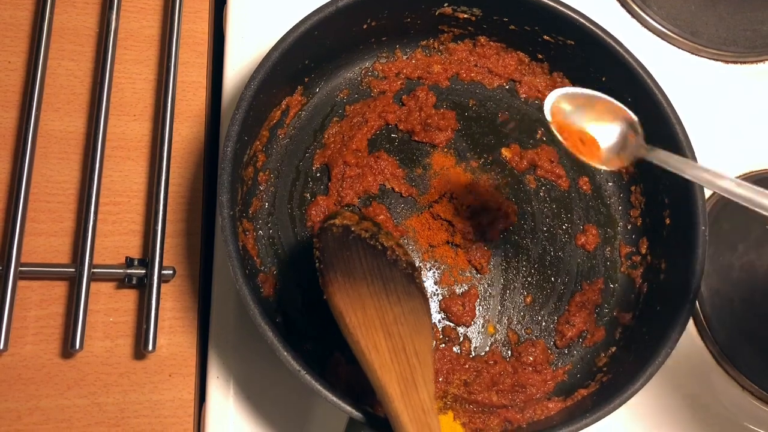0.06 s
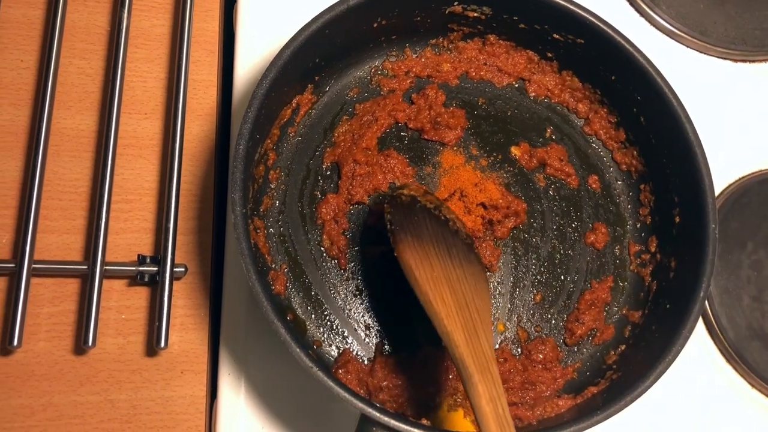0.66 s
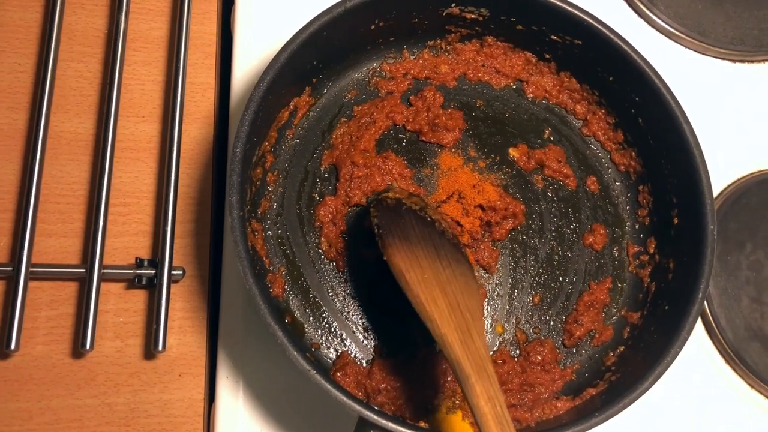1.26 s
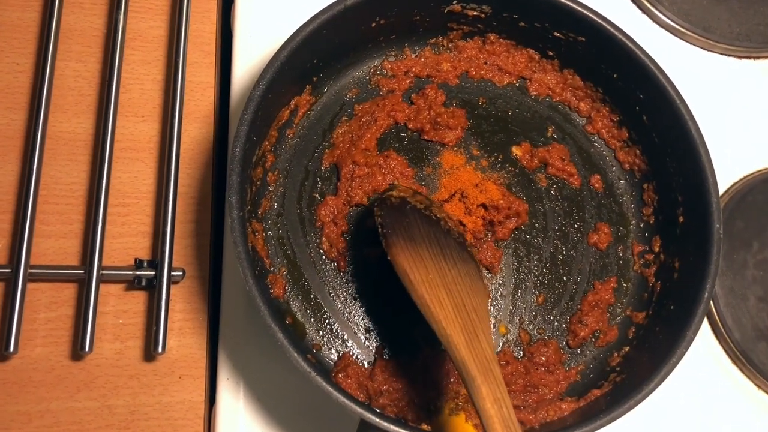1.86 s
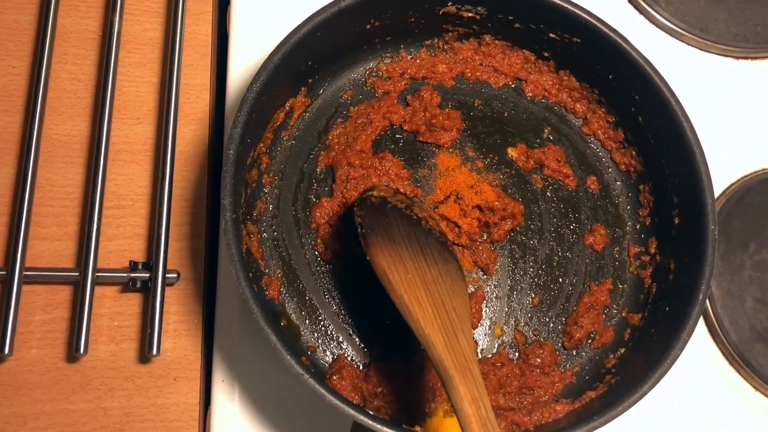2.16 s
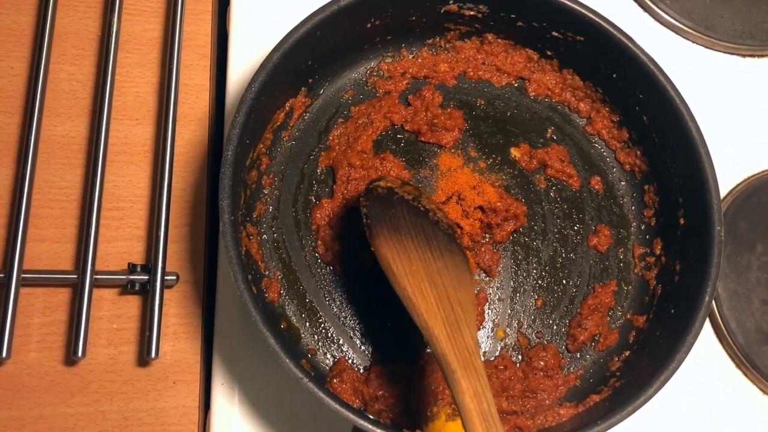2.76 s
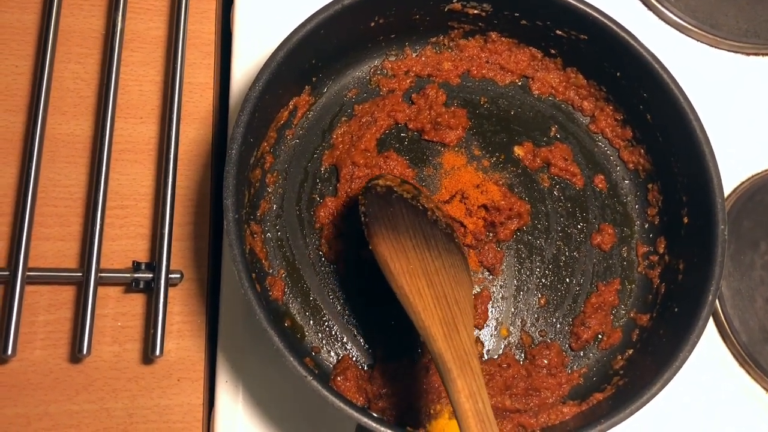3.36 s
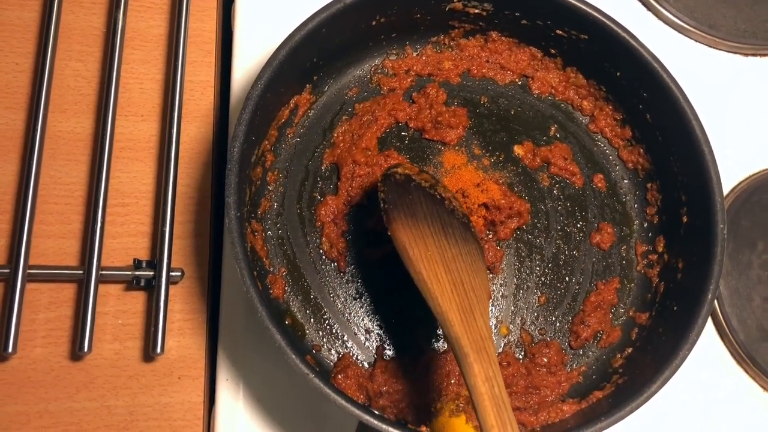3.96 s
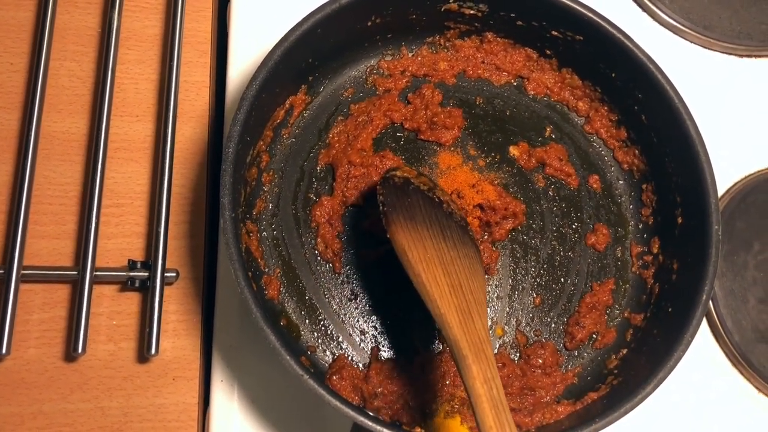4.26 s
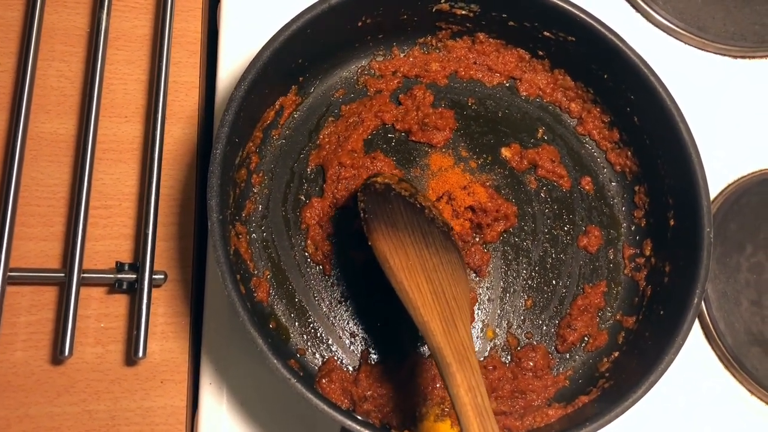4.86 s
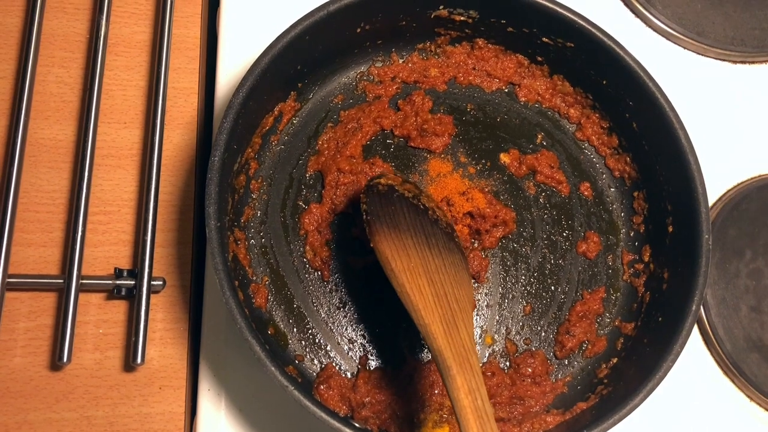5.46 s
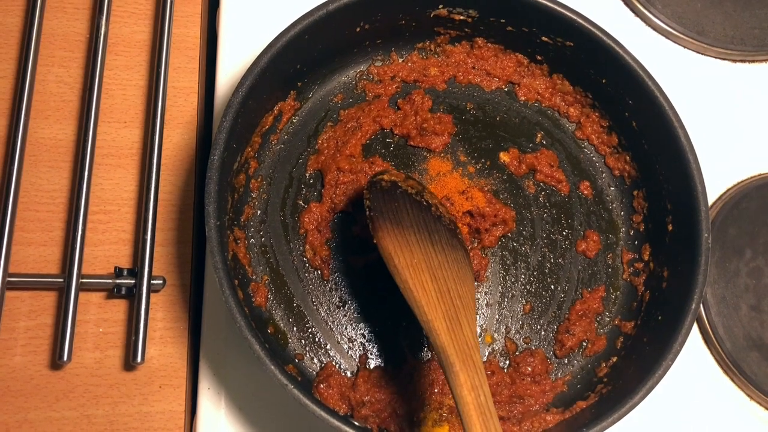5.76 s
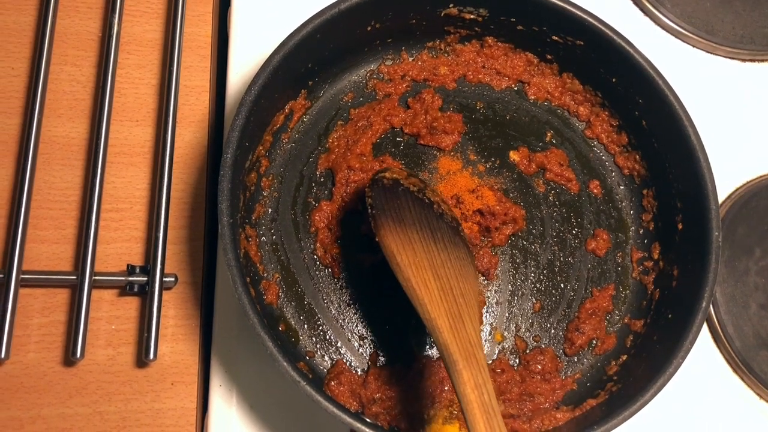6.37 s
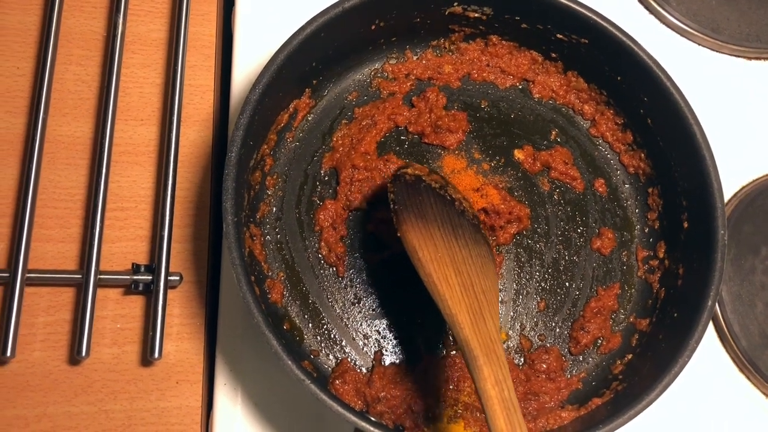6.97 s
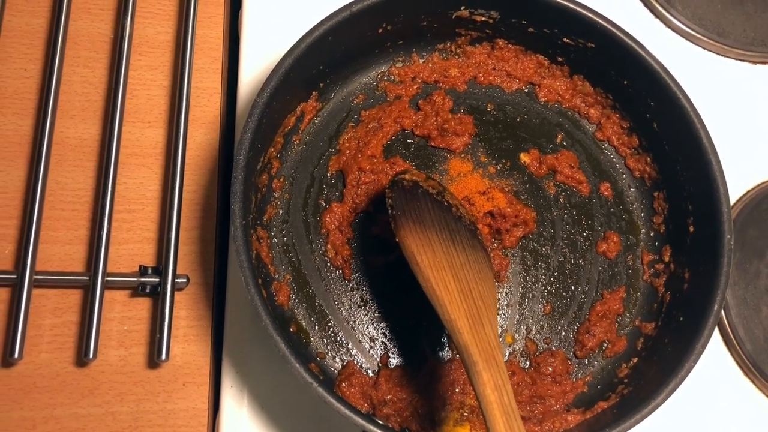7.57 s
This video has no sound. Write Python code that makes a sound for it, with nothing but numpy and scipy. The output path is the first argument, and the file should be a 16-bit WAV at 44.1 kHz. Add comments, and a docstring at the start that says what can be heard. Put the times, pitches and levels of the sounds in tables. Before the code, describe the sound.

A close, fine fizz of frying oil with small spits, one bright spoon clatter and a few wooden spatula taps on the pan.

```python
"""Spice paste sizzling gently in oil: a fine fizz of bursting bubbles, with louder spits now and then.
One microphone, close to the pan on a kitchen hob. About a second in, a steel spoon clinks onto the
worktop and settles; the recorder's gain ducks and recovers. A wooden spatula clacks, rubs, squeaks
and rocks the pan. Further back, appliances hum over a low room rumble and a faint hollow tone swells."""
import sys
import numpy as np
from scipy import signal
from scipy.fft import rfft, irfft, next_fast_len
from scipy.io import wavfile
from scipy.ndimage import uniform_filter1d, map_coordinates

SR = 44100
rng = np.random.default_rng(int(sys.argv[2]) if len(sys.argv) > 2 else 0)


def unload_audio(sound):
    """Save the sound as a 16-bit wav file, at the path given as the first command line argument."""
    columns = np.transpose(np.atleast_2d(sound))
    # keep every value between -1 and 1, then stretch to whole-number steps
    steps = np.round(np.clip(columns, -1, 1) * 32767)
    wavfile.write(sys.argv[1], SR, steps.astype(np.int16))


N = 335601


def amp(db):
    """Decibels to gain."""
    return 10 ** (np.asarray(db) / 20)


def unit(x):
    """x at rms 1."""
    return x / np.sqrt(np.mean(x ** 2) + 1e-20)


def attack_unit(x, size=SR // 100):
    """x scaled so that its first samples have rms 1."""
    return x / np.sqrt(np.mean(x[:size] ** 2) + 1e-20)


def along(points, hz):
    """(f/Hz, value) points read on a log axis."""
    f, v = np.transpose(points)
    return np.interp(np.log(hz + 1), np.log(f + 1), v)


def wobble(rate):
    """A smooth random curve, rate knots a second."""
    return map_coordinates(rng.standard_normal(int(N * rate / SR) + 4), [np.arange(N) * rate / SR])


def filtered(x, response):
    """x times a complex response of frequency."""
    m = next_fast_len(len(x) + SR // 4)
    return irfft(rfft(x, m) * response(np.fft.rfftfreq(m, 1 / SR)), m)[:len(x)]


def coloured(x, spectrum):
    """x shaped by (f/Hz, level/dB) points."""
    return filtered(x, lambda hz: amp(along(spectrum, hz)))


def noise(size, spectrum):
    """Coloured noise at rms 1."""
    return unit(coloured(rng.standard_normal(size), spectrum))


def resonate(x, modes):
    """x through (f/Hz, width/Hz, level/dB) resonances."""
    return filtered(x, lambda f: sum(amp(db) * 1j * f * width / (hz * hz - f * f + 1j * f * width)
                                     for hz, width, db in modes))


def add(track, s, sound):
    """Mix a sound into the track at time s."""
    part = track[max(round(s * SR), 0):][:len(sound)]
    part += sound[:len(part)]


# the mains, and a motor that slips behind it: f/Hz, level/dB
HUM_LINES = [(49.0, -81), (98.0, -75), (99.75, -71), (149.6, -77), (199.5, -63.8)]
# room tone: f/Hz, level/dB
ROOM_SPECTRUM = [(15, -40), (30, -28), (50, -5), (90, -2), (150, 1), (250, 1.5), (400, -5.5), (570, -2),
                 (900, -7.5), (3000, -23)]


def kitchen(room_db=-61):
    """Appliances hum in the background, two lines near 100 Hz beating slowly, over a low rumble."""
    t = np.arange(N) / SR
    hum = sum(amp(db) * np.sqrt(2) * np.sin(2 * np.pi * (hz * t + rng.random())) for hz, db in HUM_LINES)
    waver_db = 1.3 * wobble(5)
    return amp(waver_db) * hum + amp(room_db) * noise(N, ROOM_SPECTRUM)


# swells of a hollow tone: t/s, length/s, level/dB
SWELLS = [(2.45, 0.53, -61.5), (4.548, 0.42, -62), (6.8, 0.36, -63)]
# its resonance: f/Hz, width/Hz, level/dB
SWELL_TONE = [(703, 97, 0)]


def swells():
    """A faint, fuzzy tone rises out of the background and sinks again."""
    t = np.arange(N) / SR
    level = sum(amp(db) * np.sin(np.pi * np.clip((t - s) / length, 0, 1)) for s, length, db in SWELLS)
    return level * unit(resonate(resonate(rng.standard_normal(N), SWELL_TONE), SWELL_TONE))


# pushes on the pan: t/s, level/dB, time between rocks/s, loss per rock/dB, share of low rustle
PAN_PUSHES = [(1.091, -37, 0.059, 9, 0.19), (1.604, -50.5, 0.076, 0.5, 0.5), (2.234, -51, 0.057, 7, 0.3),
              (5.755, -50, 0.046, 4, 0.31), (5.951, -52, 0.041, 4, .35), (7.306, -45, 0.046, 7, 1.2),
              (7.457, -43, 0.042, 13, 0.43), (7.58, -51, .04, 9, .8)]


def pan_rocking(count=4, rock_hz=153, detune=0.045, swell_s=0.014, rustle_hz=(78, 215)):
    """A soft push rocks the pan on the hob: a run of dull, fading thuds."""
    out, t = np.zeros(N), np.arange(SR // 4) / SR
    swell = t / swell_s * np.exp(1 - t / swell_s)
    rustle_band = signal.butter(3, rustle_hz, 'bandpass', fs=SR)
    for s, db, gap_s, loss_db, rough in PAN_PUSHES:
        for k in range(count):
            hz = rock_hz * (1 + detune * rng.standard_normal())
            rustle = unit(signal.lfilter(*rustle_band, rng.standard_normal(len(t))))
            thud = swell * (np.sin(2 * np.pi * hz * t) + rough * rustle)
            add(out, s + k * gap_s, amp(db - k * loss_db) * thud)
    return out


# spatula strokes: t/s, length/s, level/dB
STROKES = [(4.81, 0.038, -54), (5.737, 0.029, -51), (5.762, 0.27, -57), (5.842, 0.024, -50)]
# the pan under the spatula: f/Hz, width/Hz, level/dB
RUBBED_MODES = [(1340, 230, -20), (1716, 100, 8), (2220, 130, -4), (2770, 390, -4), (5500, 300, -12)]


def spatula_rubs(catch_rate=1500, smooth=0.15, grip_db=4, grip_rate=40):
    """Wood slips over the pan in strokes of tiny catches, its grip uneven."""
    out, t = np.zeros(N), np.arange(SR // 2) / SR
    for s, length, db in STROKES:
        stroke = np.sin(np.pi * np.minimum(t / length, 1)) * amp(grip_db * wobble(grip_rate)[:len(t)])
        friction = rng.standard_normal(len(t))
        catches = rng.random(len(t)) < catch_rate / SR
        rub = resonate(friction * (smooth + catches) * stroke, RUBBED_MODES)
        add(out, s, amp(db) * attack_unit(rub, size=int(length * SR)))
    return out


# wood squeaking on the pan: t/s, length/s, level/dB, start f/Hz, end f/Hz
SQUEAKS = [(4.814, 0.016, -47.5, 3016, 2730), (5.847, 0.016, -50.5, 3130, 2850),
           (5.917, 0.021, -56, 2650, 3200)]


def spatula_squeaks(jitter=0.076, jitter_rate=1100):
    """The wood sticks and slips fast enough to chirp, its pitch gliding unsteadily."""
    out = np.zeros(N)
    for s, length, db, start_hz, end_hz in SQUEAKS:
        progress = np.linspace(0, 1, int(length * SR))
        glide_hz = start_hz + (end_hz - start_hz) * progress
        hz = glide_hz * (1 + jitter * wobble(jitter_rate)[:len(progress)])
        chirp = np.sin(np.pi * progress) * np.sin(2 * np.pi * np.cumsum(hz) / SR)
        add(out, s, amp(db) * unit(chirp))
    return out


# spatula blows: t/s, level/dB, cut-off f/Hz, loss per rebound/dB, f/Hz favoured by the contact point
CLACKS = [(2.202, -30.5, 9000, 4.5, 2950), (2.245, -44.5, 5000, 6, 3000), (2.294, -38.5, 8000, 10, 3950),
          (4.8206, -44.5, 3500, 11, 2900), (7.319, -44.5, 3500, 5, 2700), (7.3792, -40, 6000, 13, 4200)]
# wood striking the pan: f/Hz, width/Hz, level/dB
WOOD_MODES = [(710, 430, -11), (1130, 350, -4), (1660, 300, 0.5), (2130, 220, -0.5), (2980, 300, 3.5),
              (3920, 360, 5), (4840, 650, -1.5), (13000, 1500, 2)]


def spatula_clacks(count=3, flight_s=0.0078, shrink=0.5, dulling=0.58, thin_hz=2000,
                   scatter_db=-15.5, scatter_t60=0.025, room_db=-31, room_t60=0.42):
    """The spatula's edge catches on the pan and rebounds ever faster and duller; the room answers."""
    out, t = np.zeros(N), np.arange(SR // 4) / SR
    tail = amp(scatter_db - 60 * t / scatter_t60) + amp(room_db - 60 * t / room_t60)
    for s, db, cutoff_hz, loss_db, favoured_hz in CLACKS:
        for k in range(count):
            blow = rng.standard_normal(len(t)) * tail
            blow[SR // 2000] += 2  # the sharp impact
            blow += resonate(blow, [(favoured_hz, 700, -4)])
            clack = resonate(blow, WOOD_MODES)
            clack = signal.lfilter(*signal.butter(2, cutoff_hz * dulling ** k, fs=SR), clack)
            if k:  # light rebounds lack the lows
                clack = signal.lfilter(*signal.butter(2, thin_hz, 'highpass', fs=SR), clack)
            add(out, s, amp(db - k * loss_db) * attack_unit(clack, size=SR // 200))
            s += flight_s * shrink ** k
    return out


# the spoon ringing freely: f/Hz, level/dB
FREE_MODES = [(1714, 1), (1765, -5), (2130, -6), (2543, 4), (2611, 2.5), (2950, -3), (3103, -3), (3343, -4),
              (3440, -3), (3770, 1), (3850, 0), (3930, -0.5), (4850, -6), (5387, 1), (5470, -4), (5880, 3),
              (6110, -6), (6815, -2.5), (7512, 9), (7792, 2), (7872, 5.5), (8300, -9), (9750, 0),
              (11080, -6), (11900, -6), (13380, -5), (14050, -8), (15550, -7.5)]
# the spoon pinned by the worktop, which shifts its modes: f/Hz, level/dB
RESTING_MODES = [(2900, 2), (3280, 0.5), (3820, -2), (4120, -2), (4750, -2), (5450, 0), (5950, -2),
                 (6220, -2), (6840, 6.5), (7880, -1), (8150, -1), (9540, -3), (10460, -3), (12830, -3),
                 (13360, -6), (14000, 2)]
# decay of the steel before further damping: f/Hz, t60/s
STEEL_DECAY = [(500, 1), (2500, 0.59), (7500, 0.39), (11000, 0.39), (16000, 0.35)]


def steel_ring(t, ring_share, rest, lowest_hz, blur_hz=19, sustain=0.46, detune=0.0043, vary_db=2):
    """The spoon's modes, the low ones muted by the worktop; each slightly blurred, as heard in a room."""
    hz, level_db = np.transpose(RESTING_MODES if rest > 0.5 else FREE_MODES)
    muting_db = 60 * np.minimum(np.log2(hz / lowest_hz), 0)
    shift, strength, phase = rng.standard_normal((3, len(hz)))
    drift = np.cumsum(rng.standard_normal((len(hz), len(t))), axis=1) * np.sqrt(2 * np.pi * blur_hz / SR)
    detuned_hz = hz * (1 + detune * rest * shift)
    waves = np.sin(2 * np.pi * (np.outer(detuned_hz, t) + phase[:, None]) + drift)
    t60 = sustain * ring_share * along(STEEL_DECAY, hz)
    fades = amp(-60 * t / t60[:, None])
    return amp(level_db + muting_db + vary_db * (1 + rest) * strength) @ (waves * fades)


# spoon contacts: t/s, level/dB, tilt/(dB per octave), firmness of rest 0-1, lowest ring f/Hz, knock/dB
SPOON_CONTACTS = [(1.0612, -46, -10, 1, 1100, -65), (1.0818, -15.5, 0.8, 0.01, 1200, -58),
                  (1.098, -25, -2.5, 0, 1300, -43), (1.117, -30, -3, 0.25, 1600, -62),
                  (1.1917, -31.5, -1, 0.64, 2700, -54.5), (1.212, -41, 8, .65, 2700, -66),
                  (1.256, -43.5, -6.5, 0.3, 2300, -61), (1.3360, -31.5, -4.5, 0.62, 3000, -56),
                  (1.353, -42, -4, .62, 3000, -62), (1.386, -46, -4, 1, 3400, -71),
                  (1.5420, -28.5, -2.5, 0.72, 2200, -47.5), (1.611, -48, -7, 1, 2200, -60),
                  (1.626, -47, 3, 1, 3400, -65)]
# the crack and dense upper ring of the steel: f/Hz, level/dB
CLINK_SPECTRUM = [(300, -39), (1300, -20), (1750, -11.5), (2600, -4), (3800, -1.5), (4500, -9.5),
                  (5700, -4), (6600, -7), (7700, -6), (8700, -9), (15500, -22)]
# the worktop under the spoon: f/Hz, width/Hz, level/dB
WORKTOP_MODES = [(353, 130, 0), (520, 120, 3), (704, 90, 1.5), (926, 140, 3.5)]


def spoon(dense_db=-7.5, crack_t60=0.067, knock_t60=0.26, rest_damping=0.85):
    """Each contact cracks, rings the steel and knocks the worktop; a firmer rest shortens the ring."""
    out, t = np.zeros(N), np.arange(SR // 3) / SR
    for s, db, tilt, rest, lowest_hz, knock_db in SPOON_CONTACTS:
        ring_share = 1 - rest_damping * rest
        # crowded modes: noise that dies away band by band
        hz, when, bands = signal.stft(noise(len(t), CLINK_SPECTRUM), SR, nperseg=256)
        fades = amp(-60 * when / (ring_share * along(STEEL_DECAY, hz)[:, None]))
        dense = signal.istft(bands * fades, SR, nperseg=256)[1][:len(t)]
        crack = noise(len(t), CLINK_SPECTRUM) * amp(-60 * t / (crack_t60 * ring_share))
        clink = attack_unit(steel_ring(t, ring_share, rest, lowest_hz)) + amp(dense_db) * dense + crack
        clink = filtered(clink, lambda f: amp(tilt * np.log2(np.maximum(f, 900) / 4000)))
        clink = filtered(clink, lambda f: f / (f - 1j * lowest_hz))  # low cut
        blow = rng.standard_normal(len(t)) * amp(-60 * t / knock_t60)
        knock = resonate(resonate(blow, WORKTOP_MODES), WORKTOP_MODES)
        add(out, s, amp(db) * attack_unit(clink) + amp(knock_db) * attack_unit(knock))
    return out


# the air in the pan: f/Hz, width/Hz, level/dB
PAN_AIR_MODES = [(588, 38, -13), (776, 117, -3), (1060, 57, -1.5), (1287, 150, 3), (1725, 33, 5),
                 (2108, 115, 1.5), (3955, 160, 2.5)]


def simmer(level_db=-56, rate=900):
    """Slower bubbles in the thick paste sound the hollow of the pan."""
    bubbles = (rng.random(N) < rate / SR) * rng.standard_normal(N)
    return amp(level_db + 1.1 * wobble(12)) * unit(resonate(bubbles, PAN_AIR_MODES))


def oil_ticks(count=1200, level_db=-58, typical_hz=11500, pitch_spread=0.296, cycles=5, spread_db=4.2):
    """Tiny oil bubbles tick one by one, each ringing a few cycles at its own high pitch."""
    out, t = np.zeros(N), np.arange(SR // 200) / SR
    for s, (size, pitch) in zip(rng.uniform(0, N / SR, count), rng.standard_normal((count, 2))):
        hz = min(typical_hz * np.exp(pitch_spread * pitch), SR / 2)
        tick = np.sin(2 * np.pi * hz * t) * np.exp(-hz * t / cycles)
        add(out, s, amp(spread_db * min(size, 2)) * tick)
    return amp(level_db) * unit(out)


# the hollow of the pan as a spit sounds it: f/Hz, width/Hz, level/dB
HOLLOW_MODES = [(526, 270, -14), (1060, 62, -2.5), (1376, 200, 2.5), (1785, 150, 0), (2490, 320, -2)]


def spit(hz, cycles, hollow_db, snap_db=-8, splash_db=-19, splash_t60=0.036, room_db=-34, room_t60=0.33):
    """One bubble bursts: a snap with splash and room tail rings its cavity and the hollow of the pan."""
    t = np.arange(SR // 10) / SR
    tail = amp(splash_db - 60 * t / splash_t60) + amp(room_db - 60 * t / room_t60)
    burst = rng.standard_normal(len(t)) * tail
    burst[0] = 2  # the bubble breaks
    snap = signal.lfilter(*signal.butter(1, 1500, 'highpass', fs=SR), burst)
    cavity = resonate(burst, [(hz, hz / (2 * cycles), 0)])
    layers = [(0, cavity), (snap_db, snap), (hollow_db, resonate(burst, HOLLOW_MODES))]
    return sum(amp(db) * attack_unit(x, size=SR // 200) for db, x in layers)


# the loudest oil spits: t/s, level/dB, bubble f/Hz, ring/cycles, hollow of the pan/dB
LOUD_SPITS = [(0.1438, -44, 4500, 1.8, -9), (0.145, -38.5, 9000, 0.73, -18), (0.622, -42, 6900, 1.2, -8),
              (0.9163, -45, 4270, 0.73, -1), (0.934, -47.5, 3000, 0.61, 1), (0.9828, -38, 4000, 1.4, -4.5),
              (1.848, -42, 6300, 2, -7), (2.115, -42.5, 3970, 1.2, -8), (2.148, -42, 4420, 0.57, -9),
              (2.415, -42, 13000, 1, -13), (2.4752, -44.5, 3990, 1.2, -8), (2.608, -46, 12000, 1, -17),
              (2.8194, -37.5, 4200, 1.3, -6), (3.299, -40.5, 8300, 0.81, -26), (3.4326, -45, 3450, 1.5, -5),
              (3.661, -43, 13000, 1, -17), (4.2045, -43.5, 3900, 1.3, 5), (4.6445, -44, 3800, 1.2, 2.5),
              (4.6868, -43, 6000, 1.3, -8), (4.9785, -38, 4380, 0.88, -14), (5.3916, -38.5, 5600, 0.43, -5),
              (5.4802, -35, 4000, 1.1, -7), (5.9868, -39.5, 6060, 1.3, -19), (6.1053, -46, 6800, .7, -12),
              (6.398, -45, 8000, .8, -17), (6.4579, -36, 4900, 0.64, -16), (6.822, -49, 5000, .8, -7),
              (7.165, -36.5, 4540, 1.1, -2.5), (7.3381, -43, 5500, 0.35, -4),
              (7.47, -38.5, 10500, 0.88, -8), (7.5421, -33.5, 8200, 0.37, -10)]


def oil_spits(count=260, small_db=-54, spread_db=2.5, typical_hz=7000, loud_trim_db=-1):
    """Loud spits close to the microphone and a scatter of smaller ones, each at its own pitch."""
    out = np.zeros(N)
    for s, db, hz, cycles, hollow_db in LOUD_SPITS:
        add(out, s, amp(db + loud_trim_db) * spit(hz, cycles, hollow_db))
    for s, (size, pitch) in zip(rng.uniform(0, N / SR, count), rng.standard_normal((count, 2))):
        hz = typical_hz * np.exp(0.43 * np.clip(pitch, -2, 2))
        add(out, s, amp(small_db + spread_db * min(size, 1.7)) * spit(hz, cycles=1.7, hollow_db=-10))
    return out


# frying oil, heard beside the pan: f/Hz, level/dB
FIZZ_SPECTRUM = [(100, -27), (500, -9.5), (900, -9.5), (1400, -1.5), (3000, -1.7), (4400, 1.96),
                 (7000, 0.5), (10000, -1), (12500, 0.5), (14000, 0.3), (15200, 2), (16000, 2.5)]


def sizzle(rate=4500, spread_db=5.0, hiss_db=-46.5, crackle_db=-48.5):
    """Countless tiny bubbles merge into a hiss at steady heat; the larger ones stand out as crackle."""
    flicker_db = 0.46 * wobble(9.4) + 0.42 * wobble(45)
    size = np.minimum(rng.standard_normal(N), 1.8)
    bursts = (rng.random(N) < rate / SR) * amp(spread_db * size) * rng.choice([-1, 1], N)
    crackle = unit(coloured(bursts, FIZZ_SPECTRUM))
    hiss = noise(N, FIZZ_SPECTRUM)
    return amp(flicker_db) * (amp(hiss_db) * hiss + amp(crackle_db) * crackle)


def scene():
    """One microphone at the hob, fed to both channels."""
    frying = sizzle() + oil_ticks() + simmer() + oil_spits()
    utensils = spoon() + spatula_clacks() + spatula_rubs() + spatula_squeaks()
    mono = frying + utensils + swells() + pan_rocking() + kitchen()
    return np.array([mono, mono])


def record(dry, threshold_db=-21, attack_s=0.022, release_s=0.35, top_hz=15900):
    """The recorder's gain control ducks on a loud sound and recovers slowly; then the band limit."""
    t = np.arange(N) / SR
    level_db = 10 * np.log10(np.abs(uniform_filter1d(dry[0] ** 2, size=128)) + 1e-12)
    excess_db = np.maximum(level_db - threshold_db, 0)
    fade = np.exp(-t / release_s)
    held_db = fade * np.maximum.accumulate(excess_db / fade)  # each peak is caught, then let go
    step = 1 / (attack_s * SR)
    duck_db = signal.lfilter([step], [1, step - 1], held_db)
    return np.array([filtered(channel * amp(-duck_db), lambda hz: hz < top_hz) for channel in dry])


dry = scene()
out = record(dry)
unload_audio(out)
```